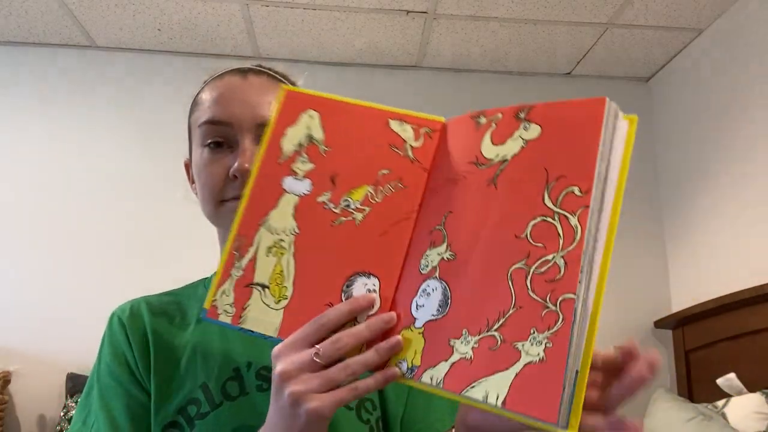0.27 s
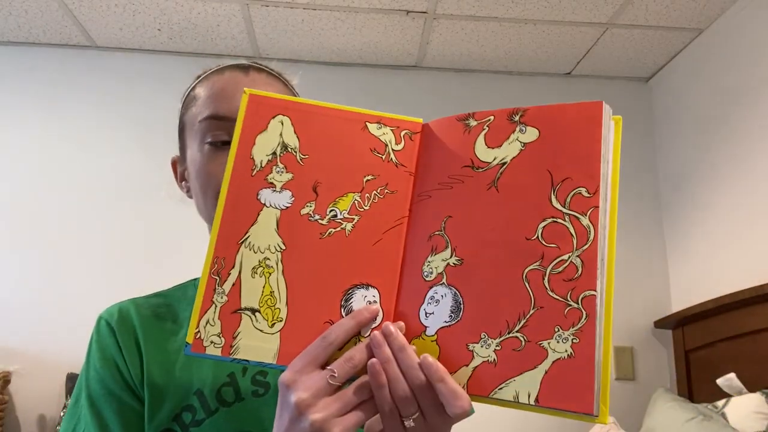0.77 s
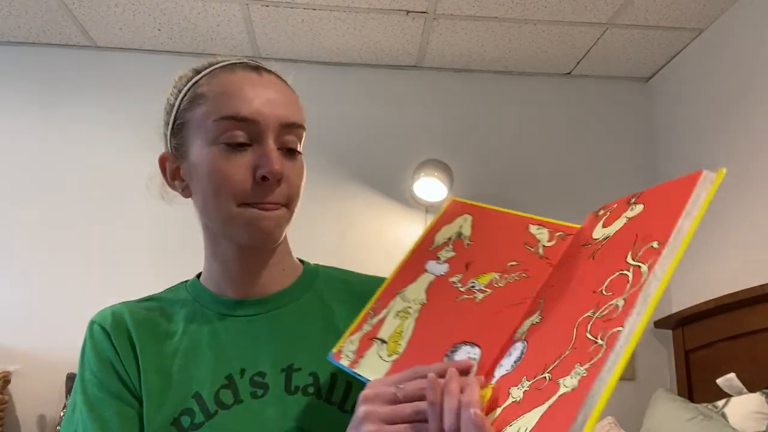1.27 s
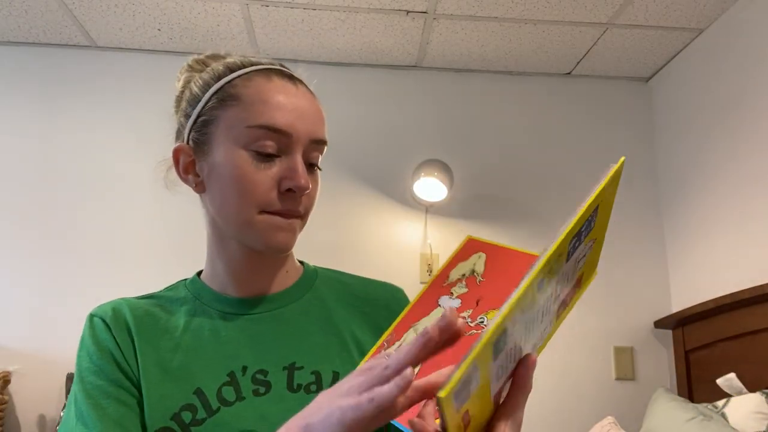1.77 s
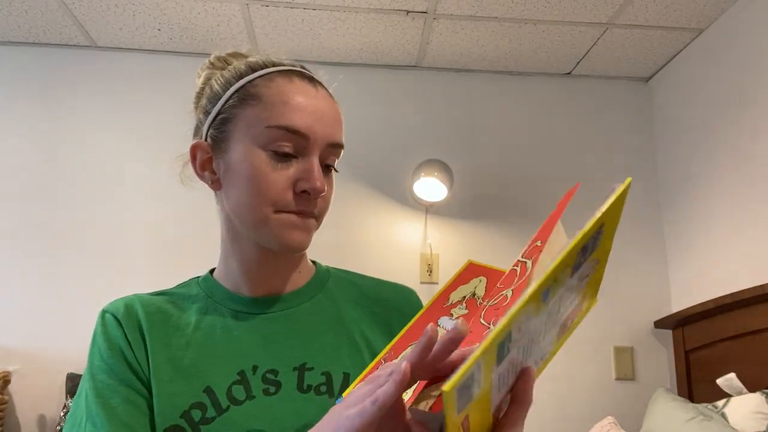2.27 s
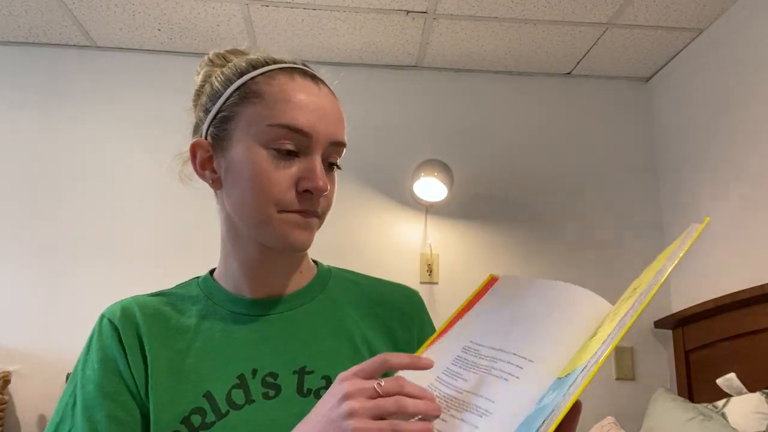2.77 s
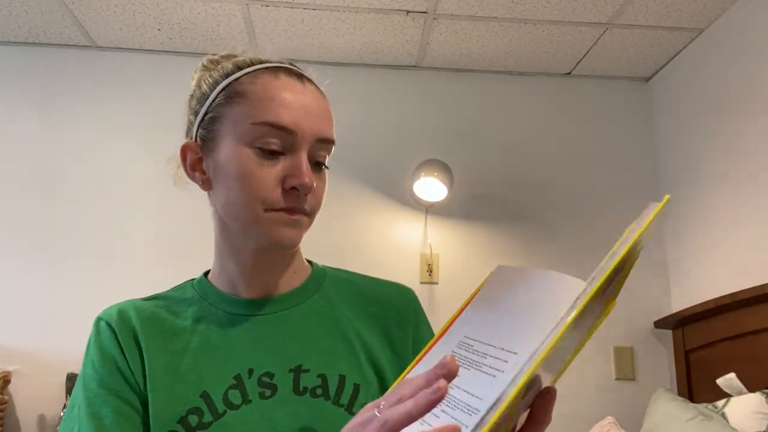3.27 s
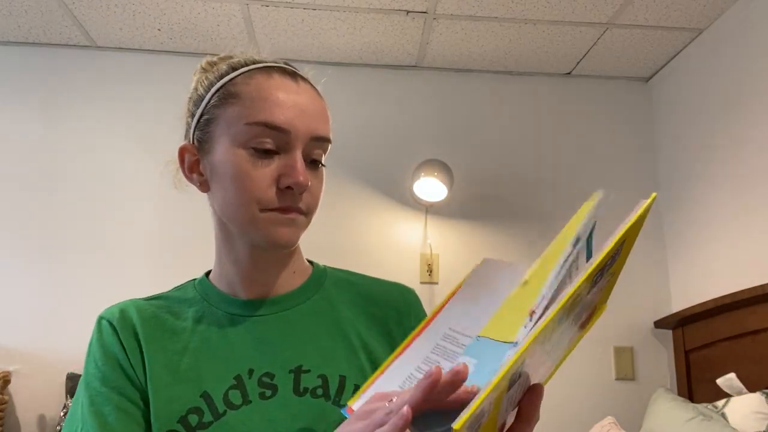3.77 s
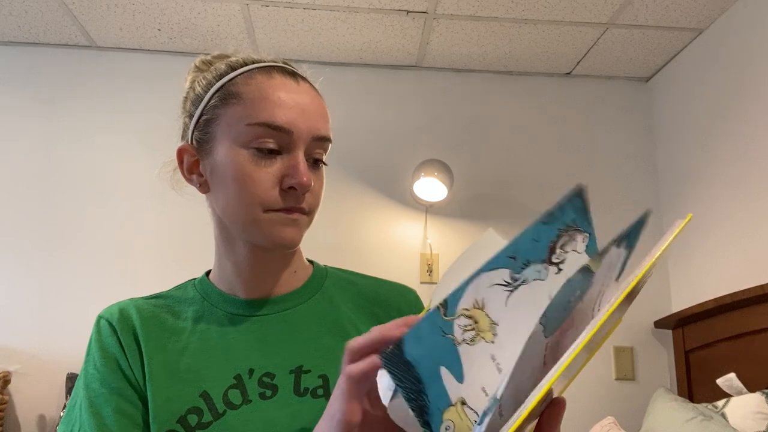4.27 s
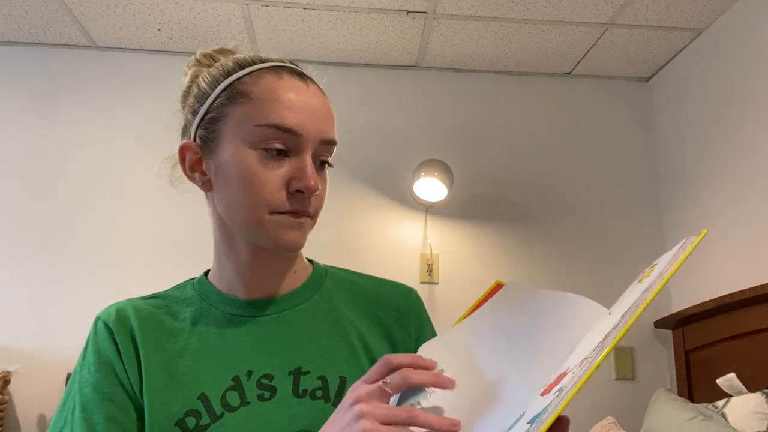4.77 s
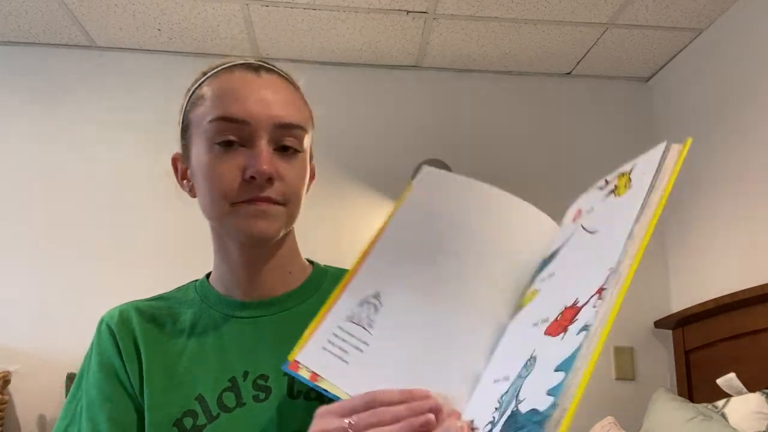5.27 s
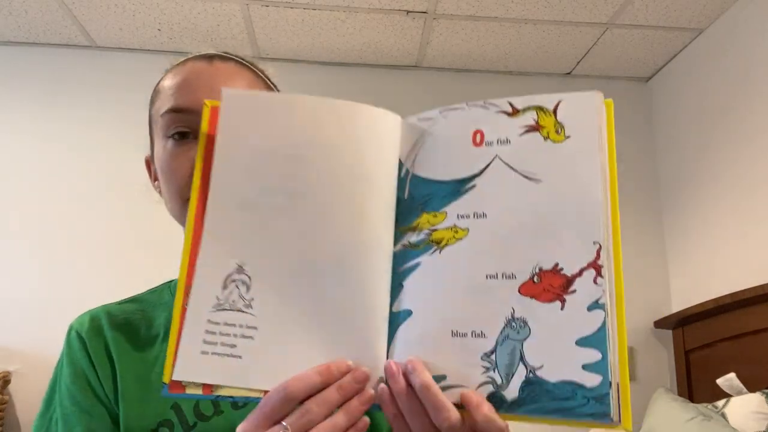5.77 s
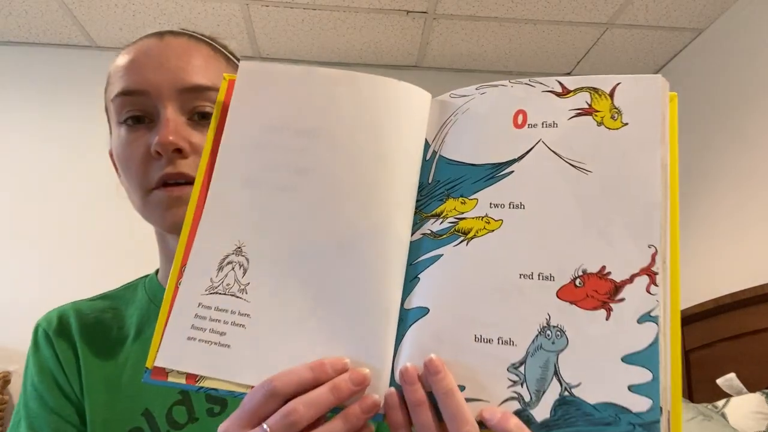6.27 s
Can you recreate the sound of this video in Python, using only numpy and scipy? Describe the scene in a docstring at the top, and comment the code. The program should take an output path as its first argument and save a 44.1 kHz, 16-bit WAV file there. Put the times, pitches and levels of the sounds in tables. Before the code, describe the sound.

Stiff hardcover pages slide, flip and snap in uneven bursts close to the microphone, over a low steady motor hum in a quiet furnished room.

```python
"""A quiet, furnished room: hands turn the pages of a hardcover book near a two-port microphone.
Sheets slide with a gritty hiss of filtered noise and scattered ticks; rubs are short swells of noise.
Buckling sheets snap as brief pops with rattle, crack and thud, and sparse reflections follow.
A far motor hums as a sum of steady tones, over the noise of moving air and faint microphone hiss."""
import sys
import numpy as np
from scipy import signal
from scipy.fft import rfft, irfft, next_fast_len
from scipy.io import wavfile
from scipy.ndimage import uniform_filter1d

SR = 44100
rng = np.random.default_rng(int(sys.argv[2]) if len(sys.argv) > 2 else 0)


def pcm_store(signal):
    """Save signal as 16-bit PCM."""
    levels = np.round(np.clip(np.atleast_2d(signal), -1, 1) * 32767)
    wavfile.write(sys.argv[1], SR, levels.astype(np.int16).T)


N = 287038  # samples in the scene
EVENT_SIZE = 4096  # samples allowed for one snap or rub

# bright spectrum of cracking paper and catching fibres: frequency_hz, relative level_db
CRACK_SPECTRUM = [(1200, -29.5), (2000, -16), (3300, -2.5), (4500, -0.5), (9200, -4), (12500, -15),
                  (14700, -20), (15600, -39.5)]


def gain_of(db):
    """Decibels to gain."""
    return 10 ** (np.asarray(db) / 20)


def evened(x):
    """Scaled to rms 1."""
    return x / np.sqrt(np.mean(x ** 2) + 1e-20)


def read(points, hz):
    """A table of frequency_hz and value, read on a log frequency axis."""
    f, value = np.transpose(points)
    return np.interp(np.log(hz + 1e-3), np.log(f + 1e-3), value)


def coloured(x, spectrum):
    """Filters along the last axis by a table of (Hz, dB); white noise comes out at about rms 1."""
    size = next_fast_len(x.shape[-1])
    hz = np.fft.rfftfreq(size, 1 / SR)
    gain = evened(gain_of(read(spectrum, hz)))
    return irfft(rfft(x, size) * gain, size)[..., :x.shape[-1]]


def patchy(spectrum, patchy_db, flicker_db):
    """Two unrelated noises whose shared level wanders in patches and flickers across all bands."""
    frames = N // 64 + 5
    a, b, c, d, patches = rng.standard_normal((frames, 129, 5)).T
    # smooth the patches over frequency, then over time
    patches = uniform_filter1d(patches, size=4, axis=0)
    patches = evened(uniform_filter1d(patches, size=10, axis=1))
    flicker = evened(uniform_filter1d(rng.standard_normal(frames), size=5))
    level = gain_of(patchy_db * patches + flicker_db * flicker)
    cells = np.array([a + 1j * b, c + 1j * d]) * level
    noise = signal.istft(cells, nperseg=256, noverlap=192)[1][:, :N]
    return evened(coloured(noise, spectrum))


def ports(pair, same, lead, tilt_db):
    """Left hears the first sound; right hears it phase-shifted and blended with the second."""
    size = next_fast_len(N)
    hz = np.fft.rfftfreq(size, 1 / SR)
    a, b = rfft(pair, size)
    same = np.clip(same(hz), -1, 1)
    turn = np.exp(1j * lead(hz))
    tilt = gain_of(tilt_db(hz) / 2)  # half the level difference on each side
    left = a * tilt
    right = (same * a / turn + np.sqrt(1 - same ** 2) * b) / tilt
    # roughly holds the level of the two ports' mean, with limited boost where they cancel
    mean_gain = np.sqrt((1 + same * turn.real) / 2 + 0.089)
    return irfft(np.array([left, right]) / mean_gain, size)[:, :N]


def played(table, sound):
    """Every event of a table placed at its start, as the pair of sounds that the ports blend."""
    out = np.zeros((2, N + EVENT_SIZE))
    noise = rng.standard_normal((len(table), 3, 2, EVENT_SIZE))
    for (start_s, *how), chance in zip(table, noise):
        first = round(start_s * SR)
        out[:, first:first + EVENT_SIZE] += sound(*how, chance)
    return out[:, :N]


def motor():
    """Shaft rotation and magnetic pull mix into steady tones; close pairs beat."""
    # how each tone arises: shaft multiple, magnetic pull multiple
    orders = [(1, 0), (2, 0), (5, -1), (3, 0), (1, 1), (2, 1), (0, 2), (5, 0), (3, 1), (4, 1), (2, 2),
              (5, 1), (6, 1), (4, 2)]
    # rms level of each tone: level_db
    levels_db = [-53.5, -68, -76, -72, -76.5, -67, -67, -87.5, -87.5, -67.5, -79, -84.5, -79, -82.5]
    shaft_hz, pull_hz = 55.8, 119.95
    port_delay_s = 0.00054  # the left port hears the motor this much later
    t, out = np.arange(N) / SR, np.zeros((2, N))
    for (shaft, pull), db, start in zip(orders, levels_db, rng.random(len(levels_db))):
        hz = shaft * shaft_hz + pull * pull_hz
        lag = hz * port_delay_s * np.array([[.5], [-.5]])  # in cycles
        out += np.sqrt(2) * gain_of(db) * np.cos(2 * np.pi * (hz * t + start - lag))
    return out


def air():
    """Low ventilation rumble falling into the faint hiss of the microphone, as filtered noise."""
    # rumble and microphone hiss: frequency_hz, relative level_db
    rumble_spectrum = [(22, -32), (37, 0), (48, -5), (59, -2.5), (70, -7.5), (100, -11), (122, -2.5),
                       (138, -12.5), (270, -20.5), (410, -18), (450, -27.5), (550, -26.5), (700, -38),
                       (1200, -46.5), (3500, -54.5), (7000, -57.5), (9000, -53.5), (11000, -58.5),
                       (13500, -64), (15500, -77.5)]
    # left-right likeness: frequency_hz, likeness (-1 to 1)
    likeness = [(60, 0.89), (150, 0.79), (380, 0.94), (950, -0.47), (2380, 0.28), (5980, 0.35),
                (15000, 0.28)]
    noise = evened(coloured(rng.standard_normal((2, N)), rumble_spectrum))
    # the left port is 0.88 dB louder below 200 Hz
    pair = ports(noise, lambda hz: read(likeness, hz), np.zeros_like, lambda hz: 0.88 * (hz < 200))
    return gain_of(-56.5) * pair


def ringing(noise, ring_hz, sharp):
    """Noise shaped to ring around one pitch, more or less sharply, as a patch of sheet does."""
    # resonance of the sheet: share of the ring pitch, level_db before sharpening
    resonance = [(.3, -29), (.6, -12.5), (.9, -10), (1, -0.5), (1.12, -7), (1.45, -10), (1.8, -16.5),
                 (2.8, -23.5), (7, -44), (16, -42.5)]
    limp_hz = 4730  # the limp sheet rings little above this
    hz = np.geomspace(100, 20000, num=120)
    limp_loss_db = 10 * np.log10(1 + (hz / limp_hz) ** 8)
    level_db = sharp * read(resonance, hz / ring_hz) - limp_loss_db
    return coloured(noise, np.transpose([hz, level_db]))


def scuff(length_s, rub_db, ring_hz, hiss_db, noise):
    """A rub, or with a low ring a thump, swells quickly and fades: ringing noise and lighter hiss."""
    # light rubbing: frequency_hz, relative level_db
    brush_spectrum = [(2000, -22), (3500, -2.5), (5500, -5.5), (8000, -0.5), (11000, -6.5), (13300, -13.5),
                      (14300, -21.5), (15600, -63.5)]
    u = np.arange(noise.shape[-1]) / SR / max(length_s, .01)
    rise_or_fall = np.minimum(u / 0.34, (1.15 - u) / .45)
    swell = np.sin(np.pi / 2 * np.clip(rise_or_fall, 0, 1))
    rub = gain_of(rub_db) * ringing(noise[0], ring_hz, 1.4)
    hiss = gain_of(hiss_db) * coloured(noise[1], brush_spectrum)
    return swell * (rub + hiss)


def pop(t, hz, cycles):
    """A few cycles that swell and die, wholly in the first sound, the one both ports share."""
    u = t * hz / cycles
    return (u * np.exp(1 - u)) ** 2 * np.sin(2 * np.pi * hz * t) * [[1], [0]]


def snap(db, ring_hz, crack_db, thud_db, noise):
    """A buckling sheet: a pop, then dying rattle, with a brighter crack and a low thud."""
    # low thud: frequency_hz, relative level_db
    thud_spectrum = [(60, -37.5), (170, -7), (420, -3), (800, -5.5), (2000, -62)]
    t = np.arange(noise.shape[-1]) / SR
    # time to fall 60 dB, ahead of the steeper drop: it halves as the crack gets 32.5 dB weaker
    t60_s = 0.093 * 2 ** (crack_db / 32.5)
    fade = gain_of(-60 * t / t60_s) / (1 + (t / .05) ** 6)  # the tail drops steeply after about 50 ms
    rattle = (1 - np.exp(-(t / 0.0045) ** 2)) * fade
    ring = 0.7 * pop(t, ring_hz, 1.3) + 0.36 * pop(t, 2.1 * ring_hz, 1.3)
    ring = ring + 0.45 * rattle * ringing(noise[0], ring_hz, 0.85)
    thud = 0.46 * pop(t, 280, 0.33) + 0.53 * rattle * coloured(noise[2], thud_spectrum)
    tick = (t / .0016 * np.exp(1 - t / .0016)) ** 2  # peaks at 1.6 ms
    crack = (0.51 * tick + 0.19 * rattle) * coloured(noise[1], CRACK_SPECTRUM)
    return gain_of(db) * (ring + gain_of(thud_db) * thud + gain_of(crack_db) * crack)


def room(x):
    """Sparse reflections of random sign, quickly soaked up by soft furnishings, the treble most."""
    size, t60_s = 6000, 0.12
    t = np.arange(size) / SR
    signs = rng.choice([-1., 1.], (2, size))
    sparse = (rng.random((2, size)) < .05) * (t > .003)  # none in the first 3 ms
    taps = signs * sparse * gain_of(-60 * t / t60_s)
    taps = taps / np.linalg.norm(taps, axis=1, keepdims=True)
    taps = signal.lfilter([.45], [1, -.55], taps)  # dulls the treble
    return signal.fftconvolve(x[:1], taps, axes=1)[:, :N]


def gritty():
    """Fibres catch and let go: scattered ticks, about 600 a second, a few of them large."""
    ticks = rng.random(N) < 600 / SR
    size = gain_of(5.5 * np.minimum(rng.exponential(1, N), 3)) * ticks
    return evened(coloured(size * rng.choice([-1., 1.], N), CRACK_SPECTRUM)) * [[1], [0]]


def strokes():
    """Fibres rubbing give a fine, gritty hiss; the flexing sheet rustles lower and in lumps."""
    # one table a stroke: time_s, sliding hiss_db (ahead of the added grit), flexing sheet_db
    page_strokes = [
        [(2.09, -84, -94), (2.16, -62, -71.5), (2.23, -51.5, -57), (2.33, -58, -60.5), (2.39, -54, -66),
         (2.45, -63.5, -65), (2.55, -80, -69), (2.64, -76, -86)],
        [(2.66, -94, -72), (2.75, -68, -62), (2.805, -70, -56), (2.86, -56, -50), (2.945, -73.5, -67),
         (3.03, -99, -79), (3.1, -99, -81.5)],
        [(3.43, -99, -89), (3.54, -93, -75), (3.67, -62, -60), (3.82, -54, -58), (3.97, -52.5, -62.5),
         (4.03, -63.5, -61), (4.12, -59, -60), (4.165, -69, -67.5), (4.29, -53, -53), (4.315, -67, -60),
         (4.6, -65, -64.5), (4.72, -71, -64), (4.86, -62.5, -65.5), (4.91, -58.5, -54), (4.96, -61, -61),
         (5.01, -58, -62), (5.035, -74.5, -64.5), (5.15, -99, -85)],
        [(5.26, -99, -84), (5.45, -80.5, -67.5), (5.5, -101.5, -79.5), (5.78, -77.5, -68.5), (5.97, -99, -89)],
    ]
    # sliding paper: frequency_hz, relative level_db
    hiss_spectrum = [(880, -28.5), (1500, -8), (2650, 0), (2950, -7), (3160, -4.5), (4860, -1.5),
                     (8010, -1), (9940, -4), (13300, -9), (14100, -23), (15600, -69)]
    # flexing sheet: frequency_hz, relative level_db
    sheet_spectrum = [(250, -31), (500, -6.5), (800, -8.5), (1250, -3), (1600, -5.5), (2100, -6),
                      (2700, -14), (3300, -13), (5000, -21.5), (8000, -53)]
    t, hiss, sheet = np.arange(N) / SR, np.zeros(N), np.zeros(N)
    for rows in page_strokes:
        s, hiss_db, sheet_db = np.transpose(rows)
        # 20 ms ramps centred on the two ends of the stroke
        touch = np.clip(np.minimum(t - s[0], s[-1] - t) / .02 + .5, 0, 1)
        hiss += touch * gain_of(np.interp(t, s, hiss_db))
        sheet += touch * gain_of(np.interp(t, s, sheet_db))
    lumps = patchy(sheet_spectrum, 2.6, 2.2)
    grain = patchy(hiss_spectrum, 2.6, 0.53) + 0.36 * gritty()
    return hiss * grain + sheet * lumps


def scene():
    """The book close by, its reflections, and the room's hum and moving air."""
    # short rubs of finger or sheet, and a low thump at 1.172 s:
    # start_s, length_s, rub_db, ring_hz, hiss_db
    rubs = [(0.03, 0.031, -75, 2730, -99), (0.165, 0.052, -66, 815, -84), (0.97, 0.036, -69, 915, -87),
            (1.04, 0.062, -69.5, 840, -79), (1.172, 0.017, -49.5, 199, -99), (1.475, 0.057, -82, 870, -85),
            (2.045, 0.021, -77.5, 1470, -99), (2.575, 0.042, -78, 2260, -70),
            (2.655, 0.067, -67.5, 726, -69.5), (2.76, 0.026, -70, 1480, -60), (2.812, 0.02, -55, 1500, -45),
            (2.9, 0.025, -62, 1500, -62.5), (2.955, 0.073, -58.5, 1430, -81),
            (3.045, 0.041, -64.5, 704, -96), (4.085, 0.024, -57, 1920, -57),
            (4.35, 0.045, -54.5, 1170, -73), (4.48, 0.072, -58.5, 1220, -64.5),
            (4.58, 0.029, -56.5, 1260, -70), (4.665, 0.031, -55.5, 1280, -87),
            (4.77, 0.056, -61.5, 2990, -60.5), (5.035, 0.041, -68.5, 1330, -62),
            (5.36, 0.065, -68.5, 1340, -94.5), (5.505, 0.03, -63, 1193, -74), (5.58, 0.055, -59, 1310, -74),
            (5.735, 0.029, -80, 1330, -73), (5.79, 0.065, -64.5, 787, -72), (5.925, 0.029, -84, 734, -75.5),
            (6.01, 0.1, -76, 1380, -98.5), (6.21, 0.026, -79, 1883, -96.5), (6.433, 0.015, -61.5, 510, -99)]
    # paper and cover snaps: start_s, level_db, ring_hz, crack_db and thud_db relative to the ring
    snaps = [(0.035, -62, 788, 2.5, -17), (0.202, -51, 786, -21, -17), (0.242, -52, 665, -8, -12),
             (0.285, -43.5, 880, -31, 3.5), (0.983, -52, 880, -21, 6), (1.048, -59, 900, -19, -14),
             (1.171, -59.5, 660, -21, -10), (1.228, -37.5, 694, -24, 4.5), (1.355, -57.5, 802, -11, -9),
             (1.48, -54, 813, -15.5, -11), (2.177, -42, 954, -15, -21), (2.357, -36, 975, -26, -2.5),
             (2.467, -22, 1400, -23, -7), (2.642, -43.5, 780, -16, 8), (2.74, -37.5, 1370, -13.5, -11),
             (2.823, -25.5, 1580, 6.5, -16), (2.8315, -22, 3256, 4, -12), (2.836, -13.5, 1446, -19, -17),
             (2.845, -29.5, 1190, -14.5, -4.5), (2.856, -33.5, 1450, -18.5, -1.5),
             (2.962, -47.5, 1540, -7.5, -19), (2.987, -41, 1440, -19, 2.5), (3.005, -39.5, 806, -32, -20),
             (3.061, -49, 670, -31.5, -2), (3.331, -59.5, 3400, -36.5, -19.5),
             (3.821, -35, 739, -13, -14.5), (3.876, -36.5, 2100, -10.5, -2.5),
             (4.122, -38.5, 1220, -3.5, -4.5), (4.142, -38, 960, -14, 3.5), (4.174, -39, 1870, 0.5, -12),
             (4.358, -47, 1230, -17, 1), (4.406, -48, 1020, -4, 2), (4.69, -52.5, 1470, 0.5, 0),
             (4.722, -41, 2170, -3.5, -22), (4.878, -41, 2360, -11, -9), (4.896, -36, 2390, 2, -22),
             (4.921, -30.5, 3000, -7.5, -13), (4.937, -32, 1230, -14, -4.5), (4.943, -33.5, 765, -19, -1.5),
             (5.002, -44.5, 1235, -6, -12), (5.217, -58.5, 2300, -4, -19), (5.297, -67.5, 830, -0.5, -16),
             (5.327, -54, 1420, -17, -6.5), (5.437, -39.5, 1280, -20, -31), (5.502, -29.5, 1200, -46, -9),
             (5.563, -61.5, 1360, -24.5, -8), (5.658, -27, 1180, -55.5, -18.5),
             (5.723, -27, 940, -41.5, -12), (5.738, -40, 1430, -39.5, -17.5),
             (5.871, -52, 665, -5.5, -21.5), (6.017, -52.5, 1288, -30, -13.5), (6.432, -54, 1440, -27, -9)]
    # the book at the two ports: frequency_hz, left_lead_radians
    book_lead = [(60, 0), (200, -.3), (600, -1.2), (1000, -.7), (2500, -1.9), (3300, -2.4), (4100, -3.9),
                 (6700, -6.4), (9500, -6.2), (11000, -5.1), (15300, -3.1)]
    # the book at the two ports: frequency_hz, left_above_right_db
    book_tilt = [(60, 1.5), (180, 1), (550, -5.5), (1650, -0.5), (4970, -1.5), (15000, 0.5)]
    paper = played(rubs, scuff) + played(snaps, snap) + strokes()
    near = ports(paper, lambda hz: 0.84 + 0 * hz, lambda hz: read(book_lead, hz),
                 lambda hz: read(book_tilt, hz))
    return near + gain_of(-7.5) * room(paper) + motor() + air()


def record(dry):
    """The band limit of the recorder: a steep low-pass at 15.7 kHz."""
    low_pass = signal.firwin(511, 15700, window=("kaiser", 9), fs=SR)
    return signal.oaconvolve(dry, low_pass[None], "same")


dry = scene()
out = record(dry)
pcm_store(out)
```